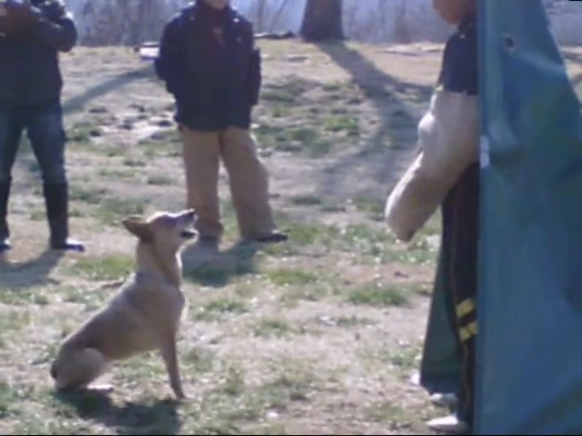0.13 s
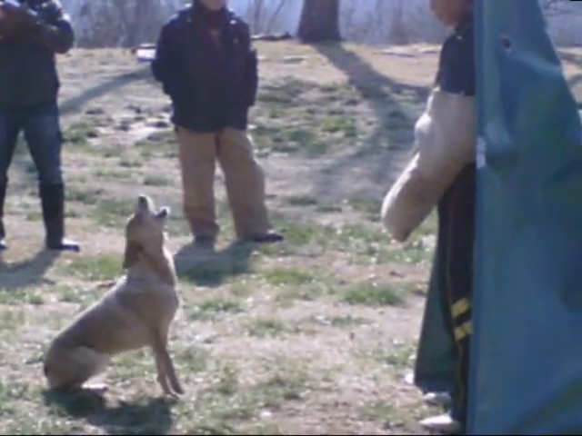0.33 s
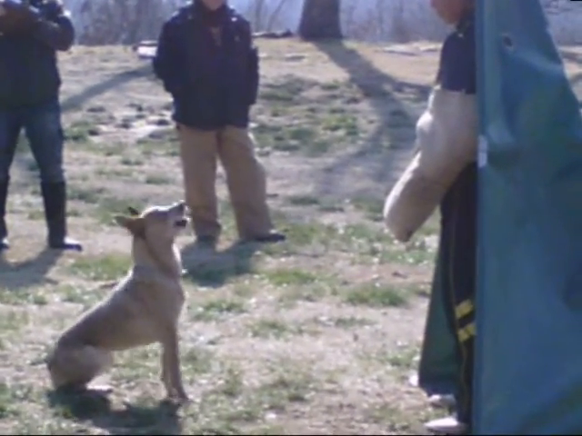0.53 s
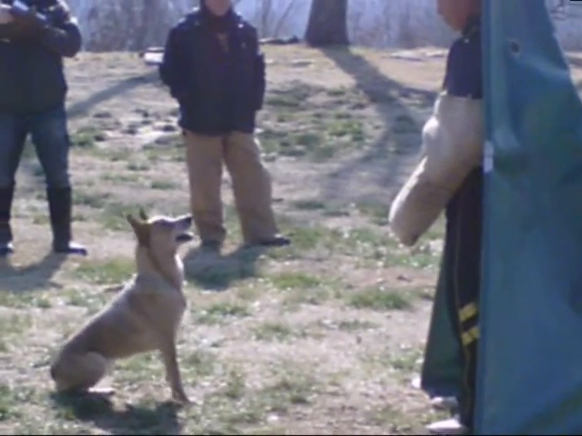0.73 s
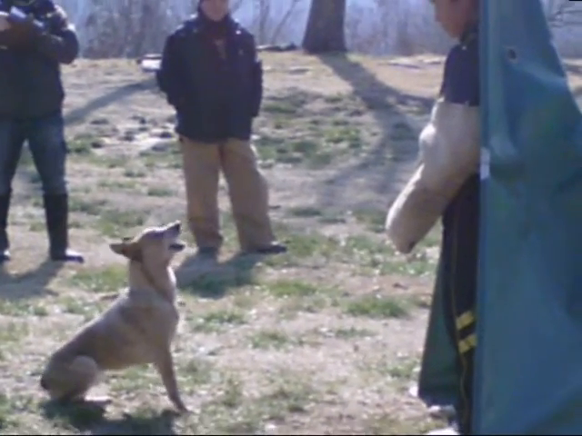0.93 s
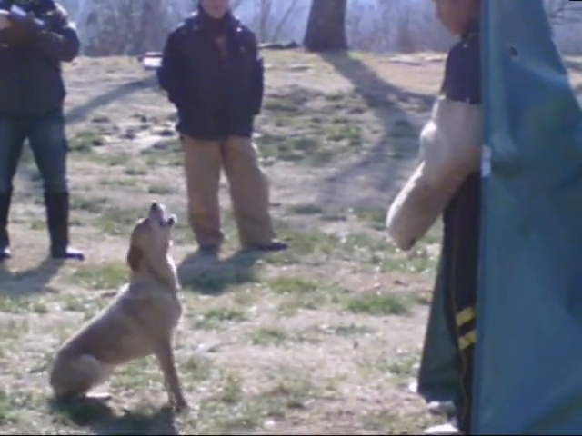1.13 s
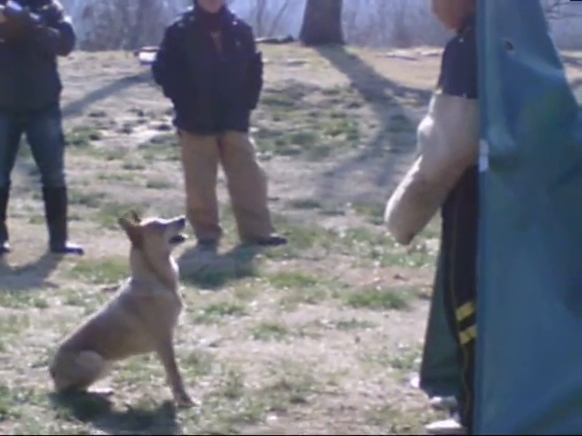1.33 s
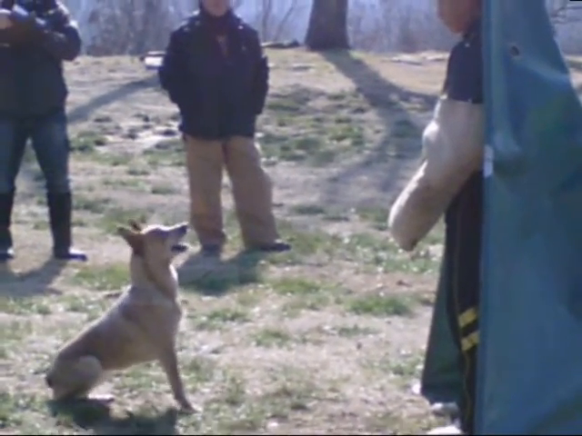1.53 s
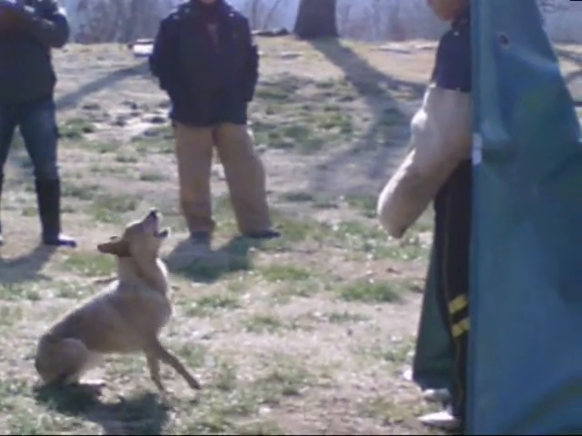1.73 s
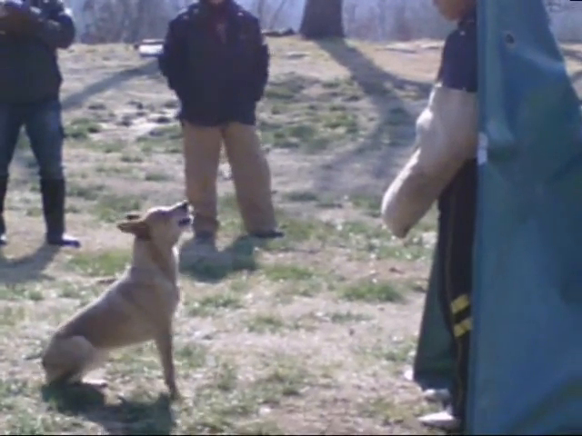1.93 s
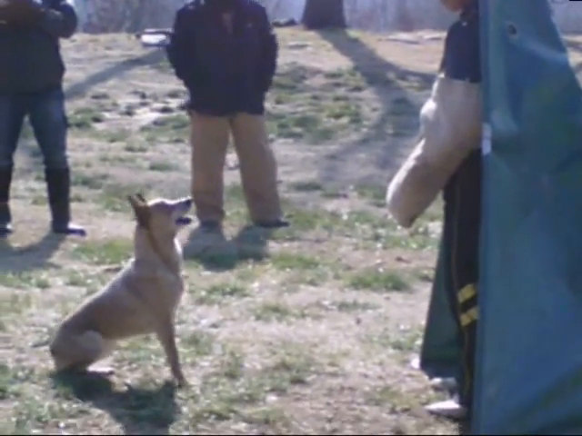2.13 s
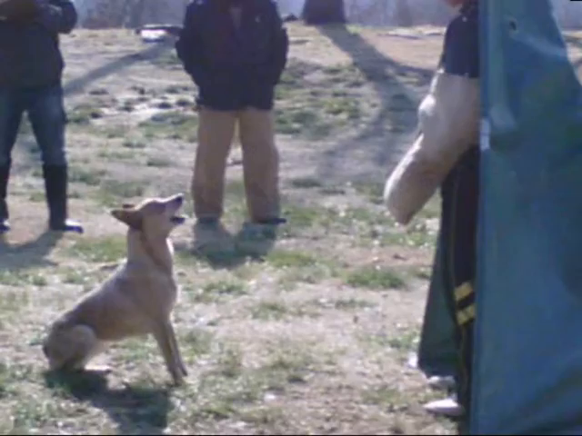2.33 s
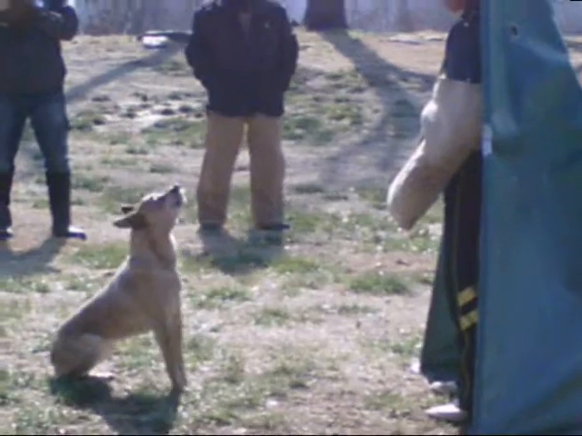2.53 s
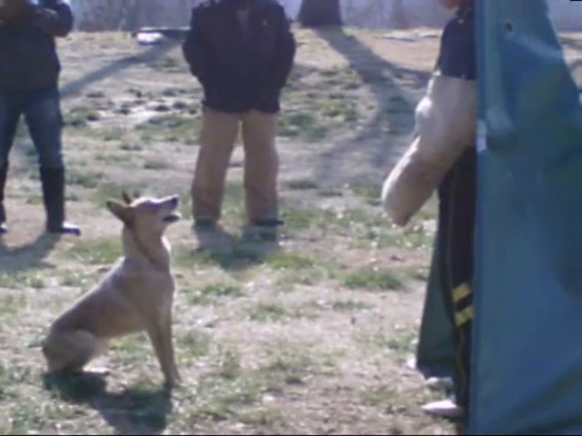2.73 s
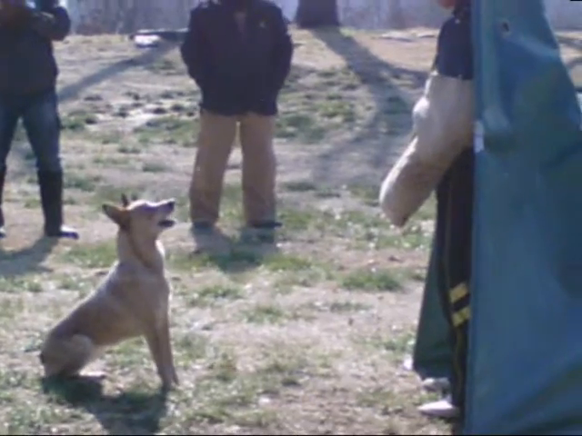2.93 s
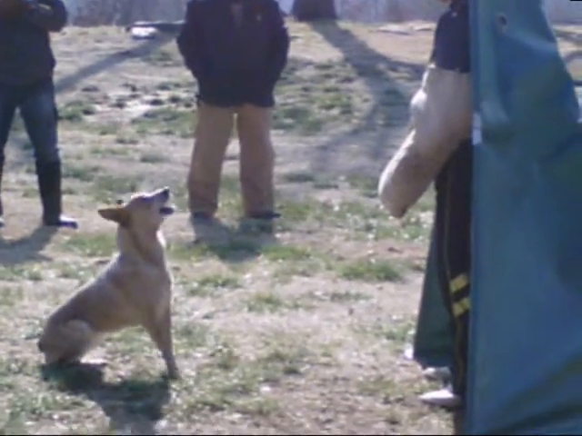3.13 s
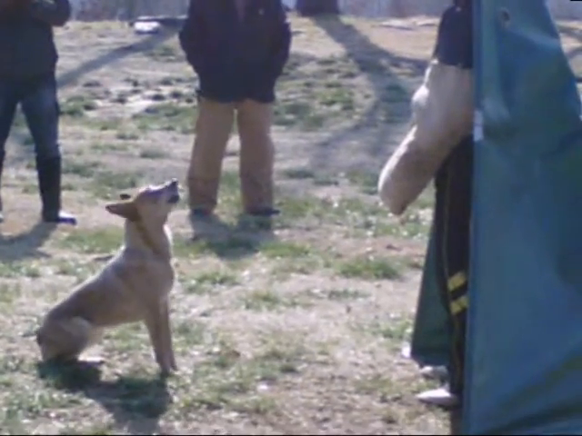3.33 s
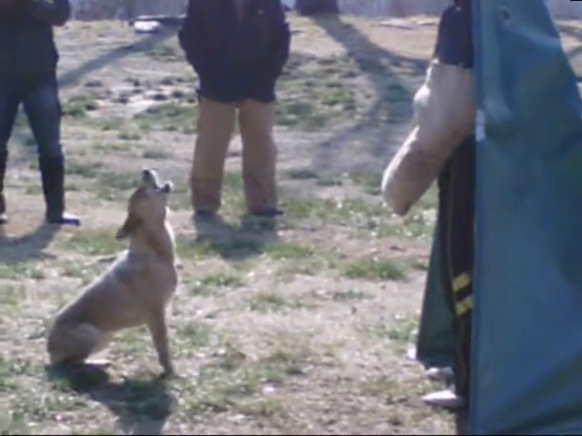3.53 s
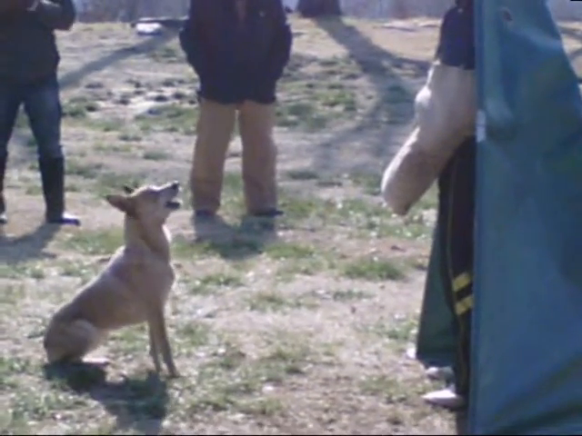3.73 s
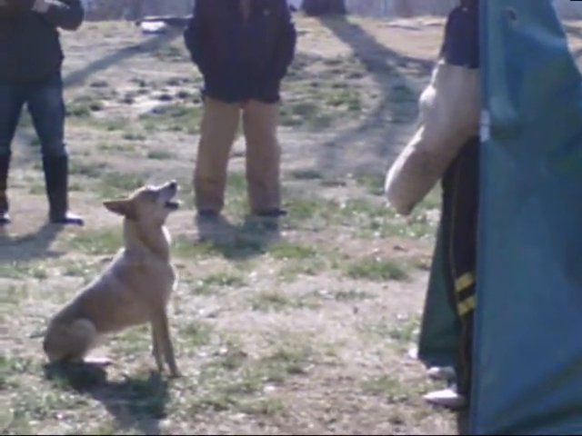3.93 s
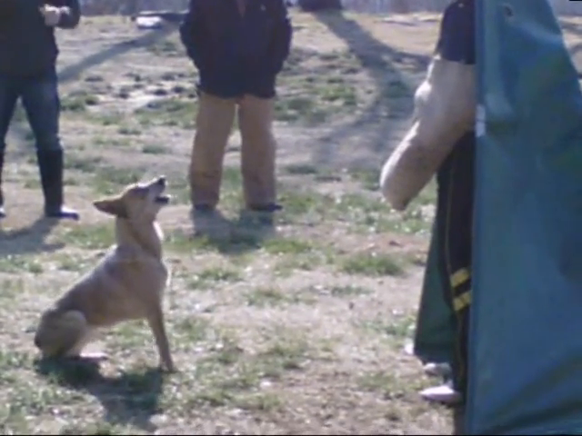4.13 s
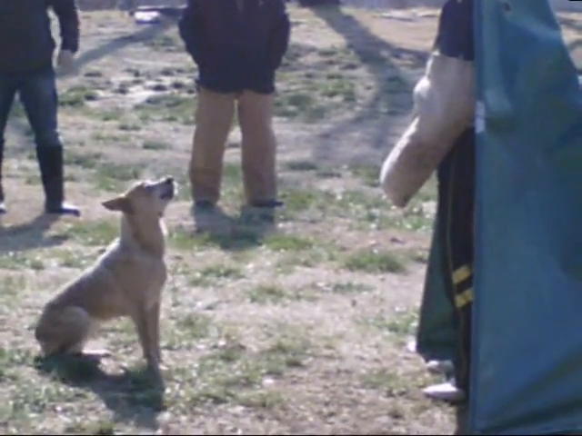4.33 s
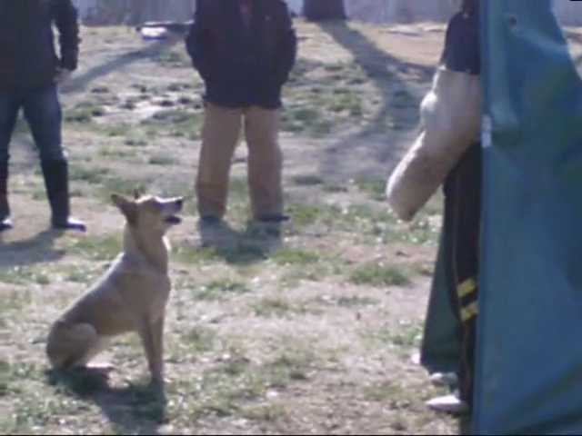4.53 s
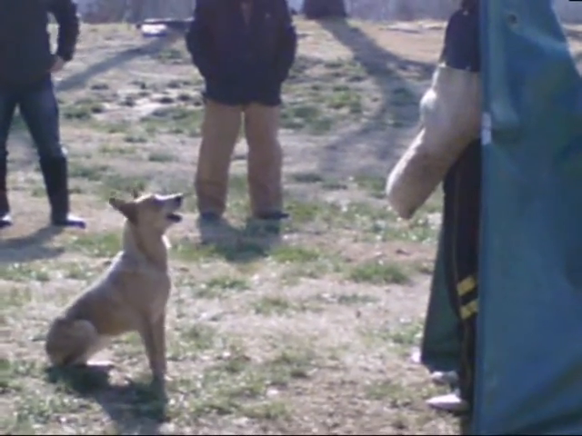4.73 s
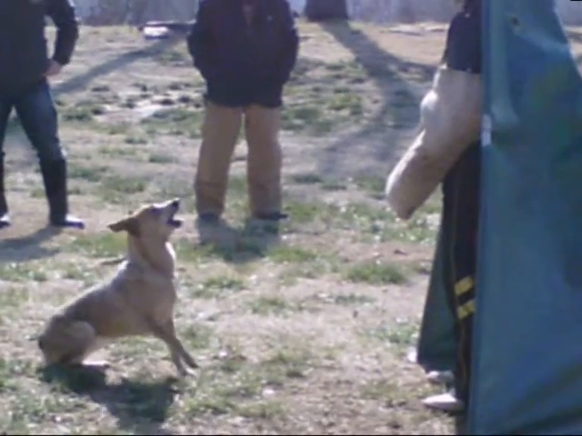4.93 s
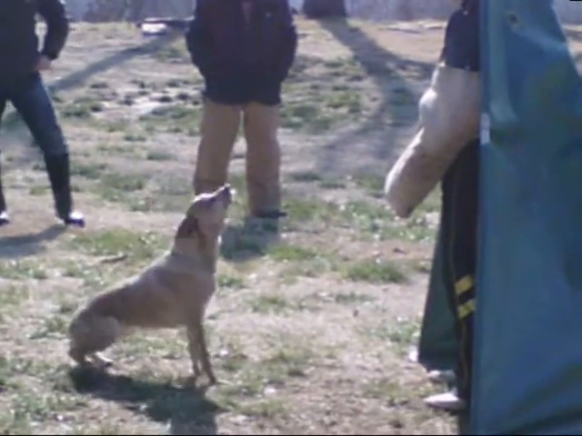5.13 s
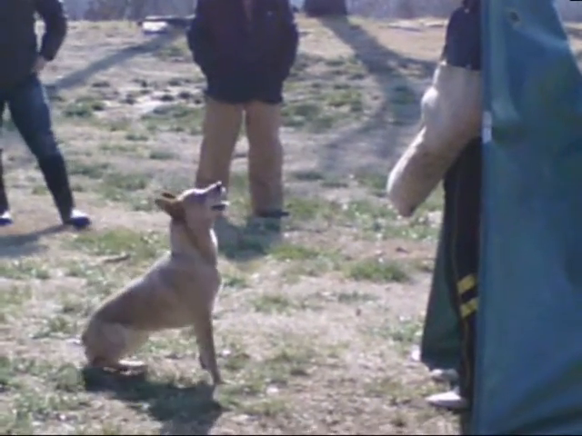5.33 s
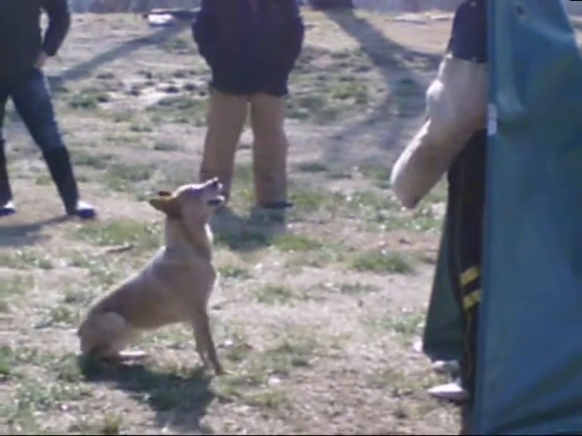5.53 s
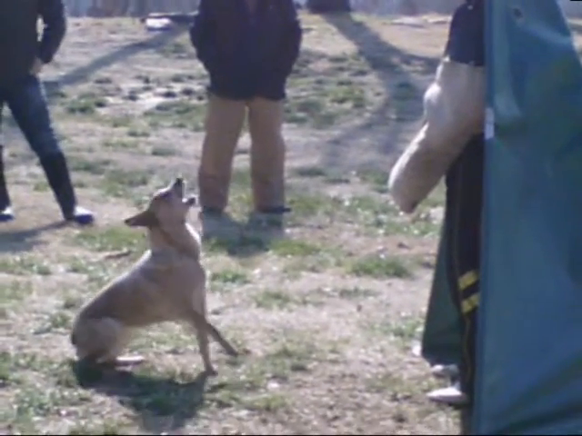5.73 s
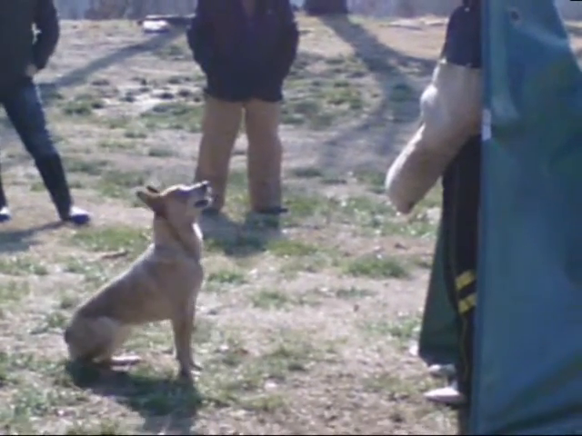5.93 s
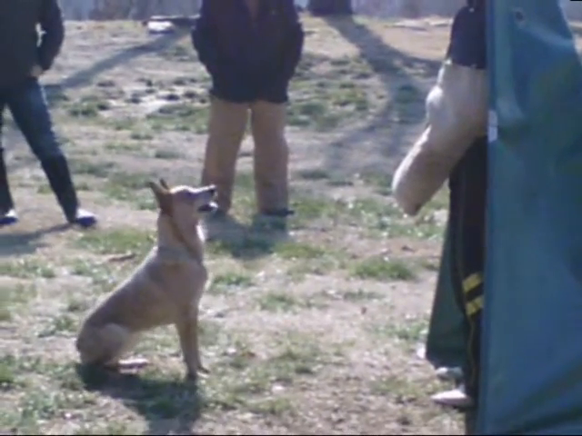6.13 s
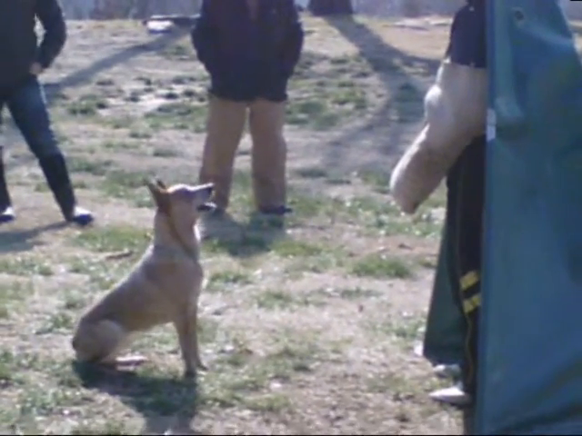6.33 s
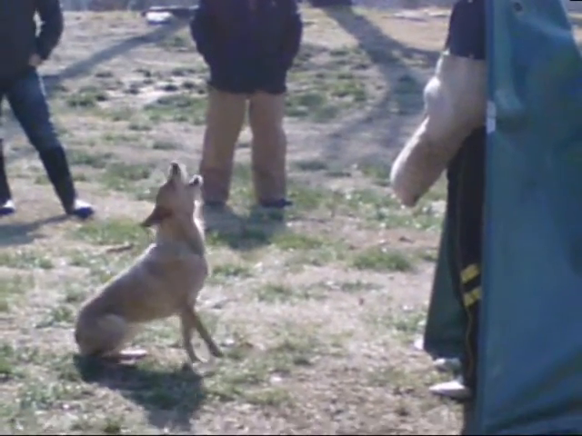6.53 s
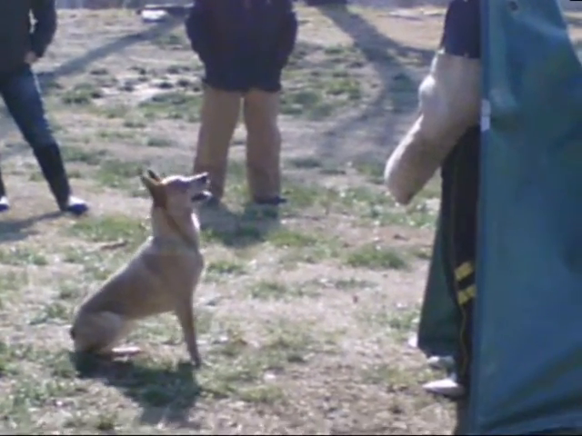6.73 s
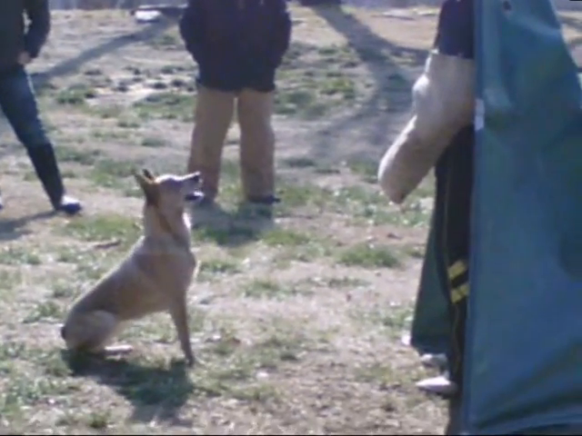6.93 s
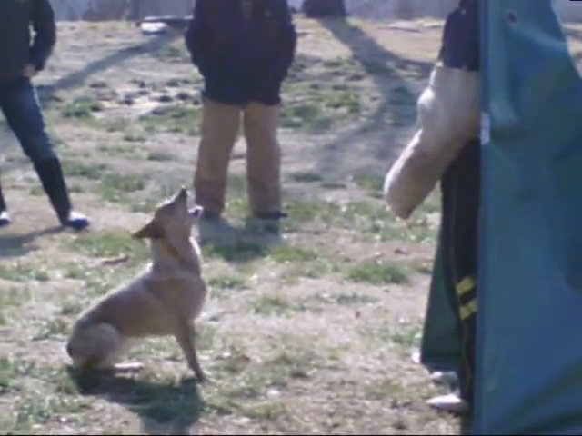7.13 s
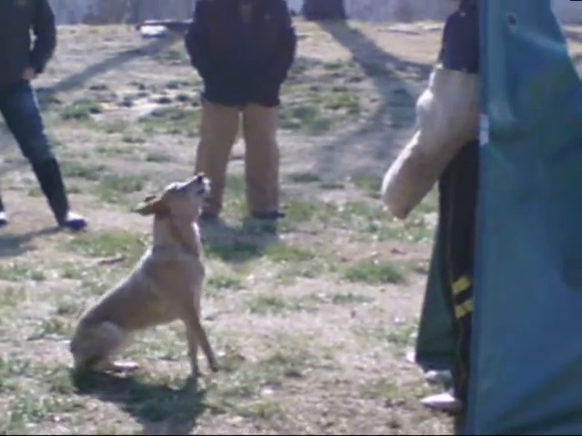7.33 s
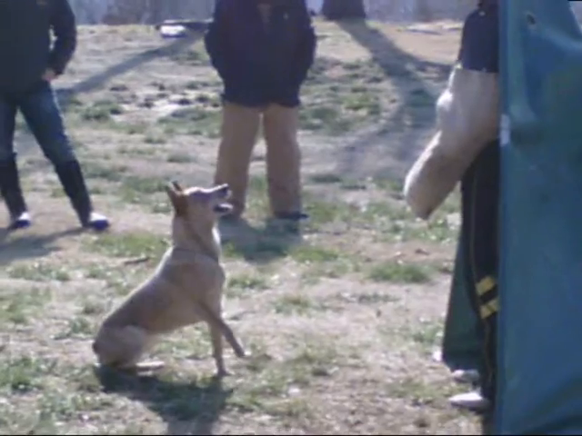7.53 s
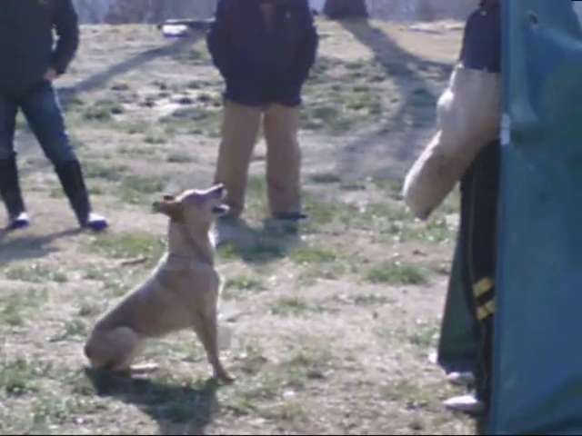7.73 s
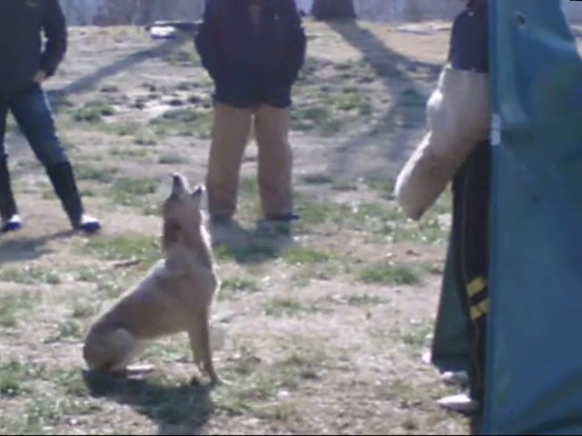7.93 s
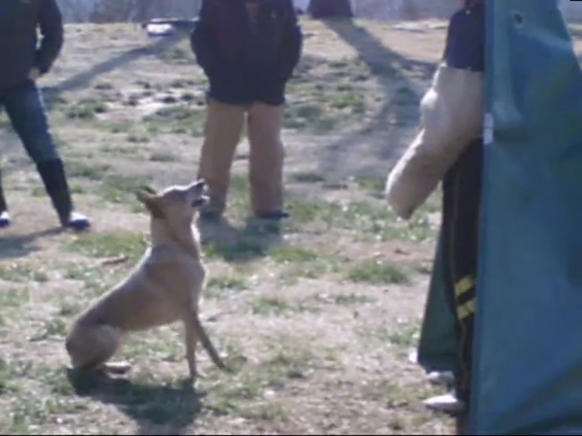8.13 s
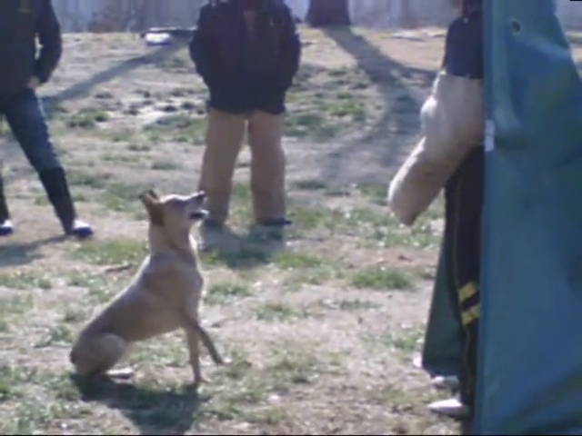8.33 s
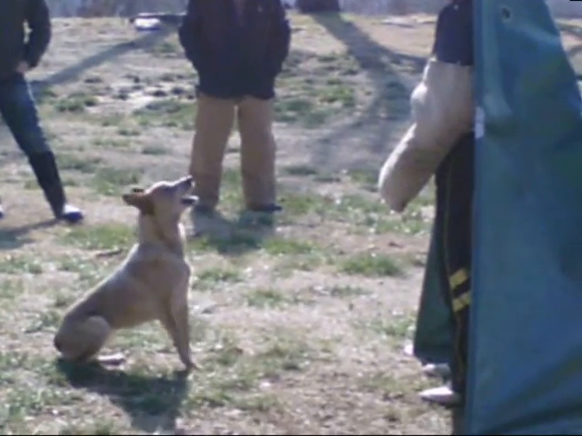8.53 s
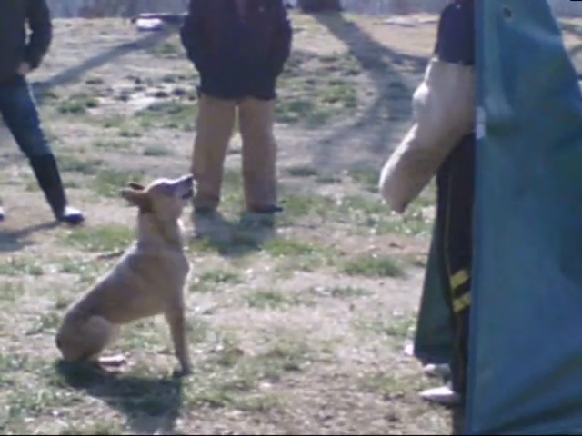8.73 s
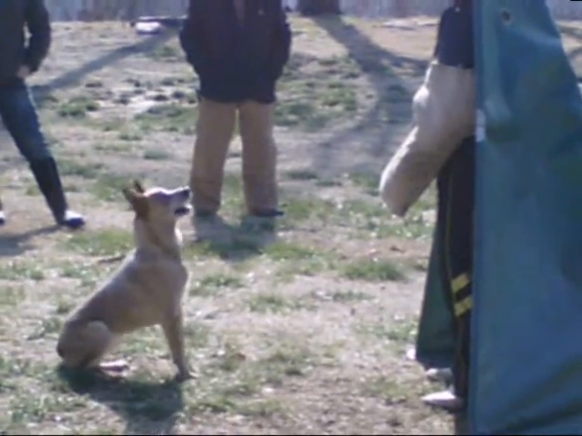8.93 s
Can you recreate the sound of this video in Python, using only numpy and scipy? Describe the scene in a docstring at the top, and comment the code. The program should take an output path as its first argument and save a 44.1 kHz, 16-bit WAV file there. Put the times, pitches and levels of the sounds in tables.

```python
"""First come wind rumbling on the microphone, a distant outdoor hush, soft rustles, a camera's pulsing whine
and the dying echo of an earlier bark. Then a dog barks thirteen times, hoarse and sharp, panting in between.
Each bark is uneven pulses and noise sent through airway resonances, brightening as the jaw opens.
Clear notes are stacks of harmonics, pants and rustles are filtered noise, and trees send back a dull tail.
There are also a few dry ticks, made of short bursts of filtered noise."""
import sys
import numpy as np
from scipy import signal
from scipy.fft import rfft, irfft
from scipy.io import wavfile
from scipy.ndimage import uniform_filter1d

SR = 44100
rng = np.random.default_rng(int(sys.argv[2]) if len(sys.argv) > 2 else 0)


def store_pcm(level_fs):
    """Save levels as 16-bit WAV."""
    pcm = np.round(np.clip(level_fs, -1, 1) * 32767).astype(np.int16)
    wavfile.write(sys.argv[1], SR, np.atleast_2d(pcm).T)


N = 396018
TIME = np.arange(N) / SR


def from_db(db):
    """Turn decibels into a gain."""
    return 10 ** (np.asarray(db) / 20)


def rms_one(x):
    """Scale a sound to an average power of 1."""
    return x / np.sqrt(np.mean(x ** 2) + 1e-20)


def coloured(x, points):
    """Shape a sound by a spectrum of (frequency [Hz], level [dB])."""
    hz, db = np.transpose(points)
    grid = np.maximum(np.arange(len(x) // 2 + 1) * SR / len(x), 1)
    gain = from_db(np.interp(np.log(grid), np.log(hz), db))
    return irfft(rfft(x) * gain, len(x))


def wobble(rate, size):
    """A random curve: `rate` chance values a second, joined by straight lines."""
    knots = rng.standard_normal(8192)
    return np.interp(np.arange(size) * rate / SR, np.arange(len(knots)), knots)


def resonate(x, modes):
    """Side-by-side resonances, each applied twice so that its sides fall off steeply."""
    out = 0
    for k, (hz, width_hz, db) in enumerate(modes):
        r = np.exp(-np.pi * width_hz / SR)
        stage = [(1 - r * r) / 2, 0, (r * r - 1) / 2, 1, -2 * r * np.cos(2 * np.pi * hz / SR), r * r]
        out = out + from_db(db) * signal.sosfilt([stage, stage], x[k % len(x)])
    return out


def moving_resonance(x, hz, width_hz):
    """One resonance whose centre follows a curve: shift the sound to zero, smooth it, shift it back."""
    turn = np.exp(2j * np.pi * np.cumsum(hz) / SR)
    r = np.exp(-np.pi * width_hz / SR)
    return np.real(turn * signal.lfilter([1 - r], [1, -r], x / turn))


def evened(x):
    """Hold the power near 1 while keeping the fast roughness."""
    size = int(.009 * SR)   # samples in 9 ms
    power = uniform_filter1d(uniform_filter1d(x * x, size), size)
    return x / np.sqrt(np.abs(power) + 1e-20)


def swell(t, centre, length):
    """A smooth rise and fall."""
    return np.cos(np.pi * np.clip((t - centre) / length, -.5, .5))


# colour of the distant outdoor hush, before its overall level is set: (frequency [Hz], level per Hz [dB])
HUSH_COLOUR = [(100, -19.5), (300, -13), (600, -6.5), (1000, 3), (1200, -11.5), (1420, -7), (1700, -13),
               (2400, -25.5), (3100, -18.5), (3800, -27), (6000, -27), (9000, -30), (11000, -38),
               (15500, -51)]


def hush(level_db=-63):
    """Distant outdoor air: steady noise with a fixed colour."""
    return from_db(level_db) * rms_one(coloured(rng.standard_normal(N), HUSH_COLOUR))


# strength of the wind on the microphone, before the boost in wind(): (time [s], level [dB])
WIND_STRENGTH = [(0.0, -49.5), (0.25, -53.5), (0.72, -54.5), (1.05, -47.5), (1.28, -54.5), (2.68, -47.5),
                 (4.5, -54), (5.0, -46.5), (5.3, -54.5), (8.28, -51.5), (8.5, -48), (8.98, -54.5)]
# colour of the wind, mostly low rumble, before its level is set: (frequency [Hz], level per Hz [dB])
WIND_COLOUR = [(5, 13), (12, 13.5), (25, -5), (50, -5), (100, -15), (160, -21.5), (300, -26.5), (700, -31),
               (2000, -67)]


def wind(boost_db=12):
    """Wind rumbling on the microphone: low noise that rises and falls with the gusts."""
    gusts = from_db(np.interp(TIME, *np.transpose(WIND_STRENGTH)) + boost_db)
    return gusts * rms_one(coloured(rng.standard_normal(N), WIND_COLOUR))


def old_echo(level_db=-47, fade_db_per_s=35):
    """Dying echo of an earlier bark: noise through the throat and mouth resonances, steadily fading."""
    voice_noise = resonate(rng.standard_normal((6, N)), THROAT_MODES + MOUTH_MODES)
    return from_db(level_db - fade_db_per_s * TIME) * rms_one(voice_noise)


# steady tones of the camera: (frequency [Hz], level [dB])
CAMERA_LINES = [(120, -66.5), (6887, -99.5)]
WHINE_HZ, WHINE_DB = 6157, -79   # level while the whine is on
WHINE_PER_S, WHINE_CENTRE_S, WHINE_DUTY = 12.424, .053, .58   # pulses a second, middle of one, share on


def camera():
    """An electronic whine that switches on and off, over faint steady tones."""
    on = np.cos(2 * np.pi * WHINE_PER_S * (TIME - WHINE_CENTRE_S)) > np.cos(np.pi * WHINE_DUTY)
    smooth_on = uniform_filter1d(on * 1., size=128)   # soften the switching
    whine = from_db(WHINE_DB) * smooth_on * np.sin(2 * np.pi * WHINE_HZ * TIME)
    steady = sum(from_db(db) * np.sin(2 * np.pi * hz * TIME) for hz, db in CAMERA_LINES)
    return np.sqrt(2) * (whine + steady)


def airy(events, modes, flutter_db):
    """Swells of noise through a set of resonances, fluttering unevenly about 32 times a second."""
    level = sum(from_db(db) * swell(TIME, centre, length) for centre, length, db in events)
    flaps = np.cumsum(32 * (1 + .25 * wobble(20, N))) / SR
    flutter = from_db(flutter_db * (np.cos(2 * np.pi * flaps) + .4 * wobble(60, N)))
    return level * rms_one(flutter) * rms_one(resonate(rng.standard_normal((2, N)), modes))


# soft distant swishes: (centre time [s], length [s], level [dB])
SWISHES = [(.08, 0.62, -63), (2.92, 0.22, -56.5), (3.11, .34, -62)]
# tone of the swishes, before their level is set: (frequency [Hz], width [Hz], level [dB])
SWISH_MODES = [(1294, 840, 10.5), (2280, 480, -3.5), (3200, 300, -6), (4900, 3100, -21)]


def swishes():
    """Soft distant swishes: gently fluttering noise, strongest in the middle range."""
    return airy(SWISHES, SWISH_MODES, flutter_db=2.0)


# dull rustles: (centre time [s], length [s], level [dB])
SCUFFS = [(.3, 0.8, -58), (.92, .06, -54), (1.02, 0.15, -54), (2.42, 0.34, -63), (4.22, 0.14, -50.5),
          (4.96, 0.28, -51.5), (7.17, 0.19, -53), (8.58, 0.21, -56.5)]
# tone of the rustles, before their level is set: (frequency [Hz], width [Hz], level [dB])
SCUFF_MODES = [(105, 110, 0), (260, 210, -4.5)]


def scuffs():
    """Dull rustles: low noise with only a slight flutter."""
    return airy(SCUFFS, SCUFF_MODES, flutter_db=-0.5)


# rise and fall of pitch in a typical bark, before chance shifts it: (time into the bark [s], pitch [Hz])
PITCH_ARCH = [(0, 472.6), (.03, 737.4), (.07, 652.7), (.11, 693.4), (.15, 518.2), (.2, 429)]
TEAR_DB, SHIFT_DB = 3.5, 2   # fast and slow chance in the drive of each resonance


def folds(t, jitter, breath, flutter_db):
    """Chaotic vocal folds: uneven pulses and a puff of noise each cycle, feeding eight inputs by fits and starts."""
    pitch = np.interp(t, *np.transpose(PITCH_ARCH))
    pitch = pitch * np.exp(.05 * rng.normal() + jitter * wobble(420, len(t)))
    cycles = np.cumsum(pitch) / SR
    pulses = rms_one(np.diff(np.floor(cycles), prepend=0))   # one click as each cycle completes
    puffs = rng.standard_normal((8, len(t))) * (1 + np.cos(2 * np.pi * cycles))
    tear_db = np.array([TEAR_DB * wobble(77.3, len(t)) + SHIFT_DB * wobble(22, len(t)) for _ in puffs])
    return (pulses + breath * puffs) * from_db(flutter_db * wobble(326.0, len(t)) + tear_db)


ONSET_DEPTH_DB = 35.5   # mouth, throat and rasp swell from this far down


def envelope(t, attack_s, push_s, sag_db_per_s, release_db_per_s):
    """Loudness of one layer of a bark: it swells, sags at a steady rate, then falls faster."""
    rise = ONSET_DEPTH_DB * np.maximum(1 - t / attack_s, 0) ** 2
    sag = sag_db_per_s * np.maximum(t - attack_s, 0)
    release = release_db_per_s * np.maximum(t - push_s, 0)
    return from_db(-rise - sag - release)


# upper resonance, sinking and then rising as the air runs out:
# (time into a typical bark [s], frequency [Hz], level against the rasp [dB])
UPPER_GLIDE = [(0, 2900, -6.5), (.035, 3144, -12), (.07, 3080, -19), (.11, 3045, 0.5), (.138, 2800, -3),
               (.16, 3000, -1.5), (.22, 3200, 4.5)]


def upper_rasp(source, age):
    """The narrow band near 3 kHz that sinks and rises again, filtered four times."""
    glide_s, *glide = np.transpose(UPPER_GLIDE)
    upper_hz, upper_db = [np.interp(age, glide_s, c) for c in glide]
    for _ in range(4):
        source = moving_resonance(source, upper_hz, width_hz=356)
    return from_db(upper_db) * evened(source)


# resonances of the dog's airway, from low to high, levels only against each other within a layer.
# All six tables: (frequency [Hz], width [Hz], level [dB])
CHEST_MODES = [(195, 160, -15.5), (371.6, 160, -6.5), (490, 108, 2)]
THROAT_MODES = [(675.3, 38, -5), (746.3, 118, -0.5), (906.6, 91, 3)]
MOUTH_MODES = [(963.6, 107, 3), (1073, 70, 2.5), (1254.4, 216, -2.5), (1372.3, 152, -2), (1480, 183, -4)]
RASP_MODES = [(1660, 120, 2), (1818, 73, -7.5), (1827, 160, 6), (2100, 650, -13.5)]
HISS_MODES = [(4103, 280, 5.5), (5165, 200, 4), (6130, 430, 0.5), (6360, 270, -6)]
FIZZ_MODES = [(7800, 180, 2), (8670, 540, -0.5), (13500, 730, -8.5), (15300, 500, -13)]
THROAT_ATTACK_S, RASP_RELEASE_LEAD_S = 0.038, .021   # the rasp lets go earlier than the rest
CHEST_ATTACK_S, CHEST_RELEASE_S = 0.021, 0.041
MOUTH_RELEASE_DB_PER_S, THROAT_RELEASE_DB_PER_S, RASP_RELEASE_DB_PER_S = 562, 133, 308
RASP_EXTRA_FADE_DB_PER_S = 54.5   # on top of the throat's fade
SHAKE_DB = 1.93   # the push is unsteady
# the jaw opens until the release and shuts again; pitch and upper resonance stretch with the bark
JAW_SHUT_HZ, JAW_DELAY_S, JAW_SHUTTING_S, TYPICAL_PUSH_S = 1034, 0.044, 0.17, .122
CHEST_FOLLOWS, HISS_FOLLOWS, FIZZ_FOLLOWS = 0.11, 0.6, 0.74   # dB gained per dB of force (for the fizz, per dB of the mouth's level)
CHEST_ABOVE_HISS_DB, FIZZ_DB = 14.5, -52.5   # before force and chance change the levels
# the last air runs out in a puff around the closing note; its rasp is weaker
PUFF_AFTER_S, PUFF_S, PUFF_RASP_DB = 0.023, 0.1, -11
BARK_END_S, BARK_FADE_S = 0.18, .015


def bark(start, attack_s, push_s, mouth_db, sag, throat_db, fade, rasp_db, rasp_attack_s, hiss_db,
         puff_db, open_hz, closing_s):
    """The hoarse body of a bark: folds drive the airway; throat and rasp fade, the mouth opens with the jaw."""
    at = np.arange(int(start * SR), min(N, int(start * SR) + SR // 3))
    t = TIME[:len(at)]
    age = t * TYPICAL_PUSH_S / push_s
    source = folds(age, jitter=.09, breath=.45, flutter_db=3.2)
    shake = from_db(SHAKE_DB * wobble(60, len(t)))
    puff = from_db(puff_db) * swell(t, closing_s + PUFF_AFTER_S, PUFF_S)

    mouth_gain = from_db(mouth_db) * envelope(t, attack_s, push_s, sag, MOUTH_RELEASE_DB_PER_S)
    jaw_times = [JAW_DELAY_S, push_s, push_s + JAW_SHUTTING_S]
    mouth_hz = np.interp(t, jaw_times, [JAW_SHUT_HZ, open_hz, JAW_SHUT_HZ])
    mouth_tone = moving_resonance(resonate(source, MOUTH_MODES), mouth_hz, width_hz=273)
    mouth = shake * (mouth_gain + puff) * evened(mouth_tone)

    throat_gain = from_db(throat_db) * envelope(t, THROAT_ATTACK_S, push_s, fade, THROAT_RELEASE_DB_PER_S)
    throat = throat_gain * evened(resonate(source, THROAT_MODES))

    rasp_gain = from_db(rasp_db) * envelope(t, rasp_attack_s, push_s - RASP_RELEASE_LEAD_S,
                                            fade + RASP_EXTRA_FADE_DB_PER_S, RASP_RELEASE_DB_PER_S)
    rasp_tone = evened(evened(resonate(source, RASP_MODES)) + upper_rasp(source[-1], age))
    rasp = shake * (rasp_gain + from_db(PUFF_RASP_DB) * puff) * rasp_tone

    # the chest tone lasts until the folds part; hiss grows with the force of the bark, fizz with the mouth's
    # level alone
    force = mouth_gain + throat_gain
    voiced_times = [0, CHEST_ATTACK_S, push_s, closing_s, closing_s + CHEST_RELEASE_S]
    voiced = np.interp(t, voiced_times, [.4, 1, 0.58, 0.51, 0.028])
    chest_gain = from_db(hiss_db + CHEST_ABOVE_HISS_DB) * force ** CHEST_FOLLOWS * voiced
    chest = chest_gain * evened(resonate(source, CHEST_MODES))
    hiss_gain = from_db(hiss_db + 4.4 * wobble(70, len(t))) * force ** HISS_FOLLOWS
    hiss = hiss_gain * evened(resonate(source, HISS_MODES))
    fizz_gain = from_db(FIZZ_DB + 1.9 * wobble(70, len(t))) * mouth_gain ** FIZZ_FOLLOWS
    fizz = fizz_gain * evened(resonate(source[::-1], FIZZ_MODES))

    gate = np.clip(t / 0.0067, 0, 1) * np.exp(-np.maximum(t - BARK_END_S, 0) / BARK_FADE_S)
    out = np.zeros(N)
    out[at] = gate * (mouth + throat + rasp + chest + hiss + fizz)
    return out


# harmonics of a clear note, against its strongest harmonic: (frequency [Hz], level [dB])
NOTE_OVERTONES = [(500, -29.5), (1000, -33), (1500, -28), (2200, -42), (2900, -25.5), (3700, -53),
                  (5000, -55.5)]
NOTE_BREAK_DB = 3.5   # even the clear notes break up a little


def clear_note(centre, length, hz, glide, db, order, waver=.014):
    """The folds lock into a brief gliding note of seven harmonics; `order` is the strongest one."""
    out = np.zeros(N)
    at = np.flatnonzero(np.abs(TIME - centre) < length / 2)
    pitch = hz * 2 ** (glide * (TIME[at] - centre)) * (1 + waver * wobble(250, len(at)))
    phase = 2 * np.pi * np.cumsum(pitch) / SR
    db = db + NOTE_BREAK_DB * wobble(130, len(at))
    shape = swell(TIME[at], centre, length)
    for k in range(1, 8):
        harmonic_db = 0 if k == order else np.interp(k * pitch, *np.transpose(NOTE_OVERTONES))
        out[at] += np.sqrt(2) * from_db(db + harmonic_db) * shape * np.sin(k * phase)
    return out


# narrow bands swallowed by side cavities of the muzzle: (frequency [Hz], width [Hz])
MUZZLE_NOTCHES = [(575, 37), (825, 5.6), (2330, 570), (3680, 400), (4490, 650), (7420, 920), (11100, 2000)]


def muzzle(x):
    """Side cavities cancel narrow bands, deepening the valleys between the peaks of the voice."""
    for hz, width_hz in MUZZLE_NOTCHES:
        x = signal.lfilter(*signal.iirnotch(hz, hz / width_hz, fs=SR), x + 1e-18)
    return x


# one row per bark, layer levels before chance and force change them:
# (start [s], attack [s], time to release [s], mouth level [dB], mouth sag [dB/s],
#  throat level [dB], throat fade [dB/s], rasp level [dB], rasp attack [s], hiss level [dB], last puff level [dB],
#  mouth resonance with the jaw wide [Hz], opening note pitch [Hz], opening note level [dB],
#  time to closing note [s], closing note pitch [Hz], closing note level [dB])
BARKS = [ (.410, 0.068, 0.12, -18.5, 24, -20.5, 150, -35, 0.045, -48, -38, 1200, 796, -23, 0.19, 467, -53),
         (1.103, 0.047, 0.12, -19, 28.5, -24, 147.5, -34, 0.045, -48.5, -51, 1259, 749, -21.5, 0.16, 490, -42.5),
         (1.830, 0.06, .106, -17.5, 96, -25, 139, -37, 0.04, -48.5, -44.5, 1196, 751, -26.5, 0.17, 526, -41),
         (2.503, 0.051, 0.12, -18.5, 0, -26, 91, -38.5, 0.037, -49, -50, 1140, 747, -24, 0.15, 508, -37),
         (3.238, 0.059, .110, -16, 131, -25, 162, -36, 0.035, -47, -55.5, 1100, 743, -27.5, 0.17, 480, -39),
         (3.539, 0.076, 0.12, -22.5, 3, -26, 46, -35.5, 0.045, -55, -61.5, 1310, 750, -45, 0.16, 487, -34.5),
         (4.251, 0.068, 0.11, -18, 9, -27, 50, -35.5, 0.04, -47.5, -49, 1320, 730, -36.5, 0.16, 471, -47.5),
         (5.095, 0.047, .100, -17.5, 143, -25, 200, -31.5, 0.051, -48, -48, 1240, 533, -27.5, 0.17, 460, -55),
         (5.821, 0.059, .120, -20, 2, -25, 94, -38.5, .035, -50.5, -49, 1250, 736, -26, .151, 496, -33),
         (6.539, 0.073, .130, -18.5, 26, -23.5, 134, -32, 0.052, -49, -47.5, 1210, 764, -18.5, .150, 516, -35.5),
         (7.243, 0.051, .106, -18.5, 138, -22.5, 211, -34, 0.036, -49.5, -56.5, 1320, 727, -34, 0.15, 490, -48.5),
         (7.972, 0.058, 0.12, -19, 23, -24.5, 106, -38.5, 0.043, -50.5, -48.5, 1380, 733, -43, .162, 480, -39.5),
         (8.677, .050, 0.11, -19, 28, -22, 136, -32, 0.034, -48, -50, 1210, 704, -30.5, 0.14, 498, -39), ]
# yelps that crest some barks, strongest on the second harmonic:
# (centre time [s], length [s], pitch [Hz], glide [octaves/s], level [dB])
YELPS = [(0.531, .04, 684.5, -4.5, -28.5), (3.298, 0.027, 610, 4.5, -24.5), (4.365, .058, 707, 0.8, -24),
         (5.137, 0.018, 700, 5.5, -22), (5.175, .072, 505, -2.8, -26.5), (7.305, .033, 633, 3.5, -18.5),
         (7.343, .04, 738.6, 0, -24)]
# the folds run clear for a moment as a bark opens, and again, lower, later in the bark
OPENING_AT_S, OPENING_S, OPENING_OCTAVES_PER_S = .033, .04, 1.4
CLOSING_S, CLOSING_OCTAVES_PER_S, CLOSING_GLIDE_SPREAD = .042, -3, 2.7   # spread in octaves per second


def barking():
    """Each bark has a clear opening note, a hoarse body and a lower, usually falling close; a few crest in a yelp."""
    hoarse = 0
    clear = sum(clear_note(*yelp, order=2) for yelp in YELPS)
    for start, *voice, opening_hz, opening_db, closing_s, closing_hz, closing_db in BARKS:
        hoarse = hoarse + bark(start, *voice, closing_s)
        clear += clear_note(start + OPENING_AT_S, OPENING_S, opening_hz, OPENING_OCTAVES_PER_S,
                            opening_db, order=1)
        glide = CLOSING_OCTAVES_PER_S + CLOSING_GLIDE_SPREAD * rng.normal()
        clear += clear_note(start + closing_s, CLOSING_S, closing_hz, glide, closing_db, order=1, waver=0.047)
    return muzzle(hoarse) + clear


# how the echo dies away, before its overall level is set: (delay [s], level [dB])
ECHO_SHAPE = [(0, 6.5), (.04, 1.5), (.1, -10), (.18, -7), (.27, -21.5), (.35, -17), (.43, -24.5), (.7, -27),
              (1.1, -54.5)]
# dull colour of the echo, before its overall level is set: (frequency [Hz], level [dB])
ECHO_COLOUR = [(200, -25), (500, 5), (750, 8.5), (1000, 12), (1300, 3.5), (1550, 5), (2000, 7.5), (3100, 3),
               (5000, -16.5), (12000, -47)]


def field(x, echo_db, clump_db=2.0):
    """Uneven scatter from ground and trees, with later swells: the sound is smeared by one second of noise."""
    level_db = np.interp(TIME[:SR], *np.transpose(ECHO_SHAPE)) + clump_db * wobble(45, SR)
    scatter = coloured(rng.standard_normal(SR), ECHO_COLOUR) * from_db(level_db)
    return from_db(echo_db) * signal.fftconvolve(x, scatter / np.sqrt(SR))[:N]


# the dog's panting between barks: (centre time [s], length [s], level [dB])
PANTS = [(.66, 0.083, -56), (.97, 0.25, -57.5), (1.34, 0.077, -68), (2.42, 0.51, -62), (2.73, 0.13, -57.5),
         (4.23, 0.029, -72), (4.8, 0.2, -59.5), (4.98, 0.29, -54), (7.16, 0.19, -57), (8.6, 0.31, -58.5)]
# tone of the panting, before its level is set: (frequency [Hz], width [Hz], level [dB])
PANT_MODES = [(420, 430, 6.5), (970, 190, 13), (1780, 230, 3.5), (3080, 400, -5.5), (4220, 540, -18.5),
              (5700, 530, -17.5)]


def panting():
    """Snatched breaths: strongly fluttering noise through airway resonances."""
    return airy(PANTS, PANT_MODES, flutter_db=5.5)


# dry ticks, three of them much louder than the rest: (time [s], level [dB])
TICKS = [(0.834, -62), (1.034, -55), (1.59, -65), (3.229, -55), (3.307, -38), (5.154, -41), (5.57, -58),
         (7.314, -42.5)]
# tone of the ticks, before their level is set: (frequency [Hz], width [Hz], level [dB])
TICK_MODES = [(2500, 1400, -0.5), (4640, 2200, -14), (8200, 2200, -21), (13200, 2500, -29)]


def ticks(decay_s=.0016):
    """Tiny dry ticks: noise that starts at once and dies away within milliseconds."""
    level = sum(from_db(db) * (TIME >= s) * np.exp(-np.abs(TIME - s) / decay_s) for s, db in TICKS)
    return level * rms_one(resonate(rng.standard_normal((1, N)), TICK_MODES))


def scene():
    """The quiet field, the dog and its echo, the small noises and the camera, added together."""
    background = hush() + wind() + old_echo()
    small = swishes() + scuffs() + ticks()
    dog = barking() + panting()
    return (background + camera() + small + dog + field(dog, echo_db=-15))[None]


def record(dry):
    """The recorder cuts the top steeply above 15680 Hz."""
    return signal.sosfilt(signal.ellip(12, .1, 80, 15680, fs=SR, output="sos"), dry)


dry = scene()
out = record(dry)
store_pcm(out)
```